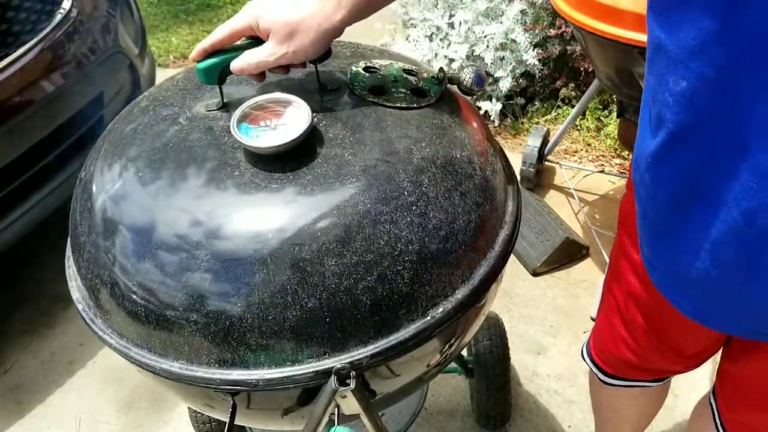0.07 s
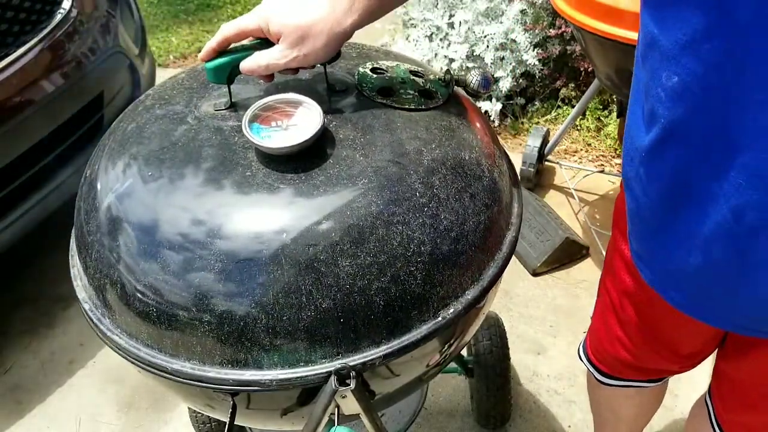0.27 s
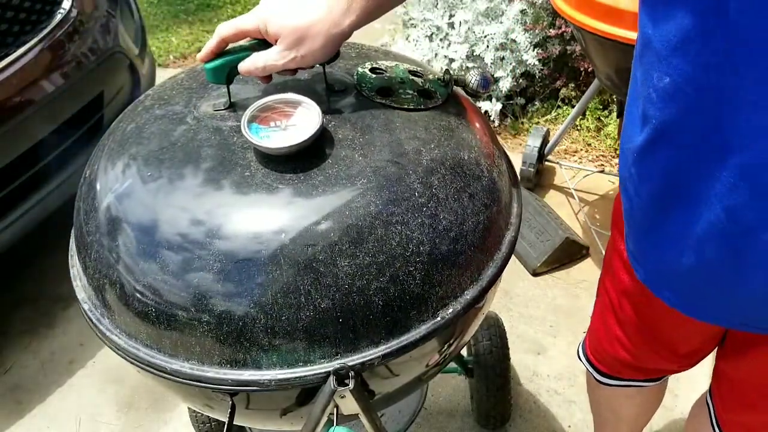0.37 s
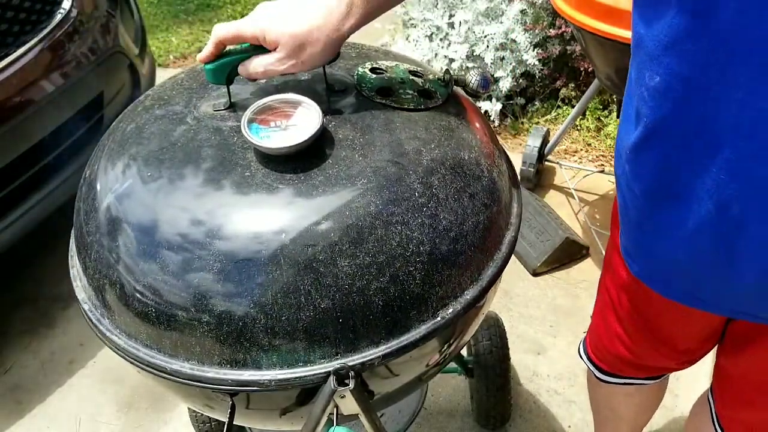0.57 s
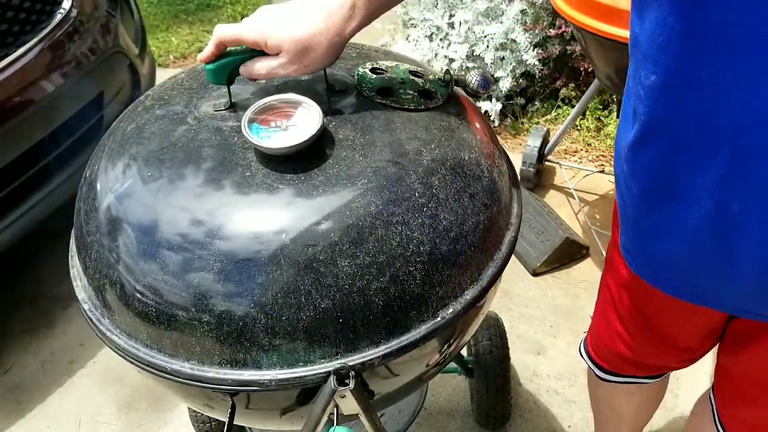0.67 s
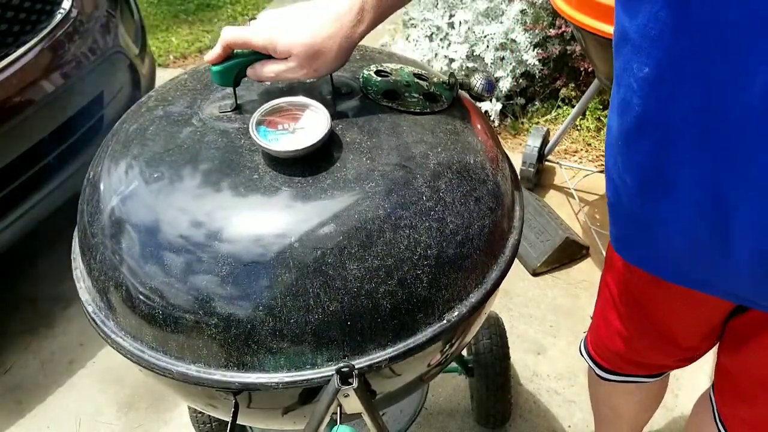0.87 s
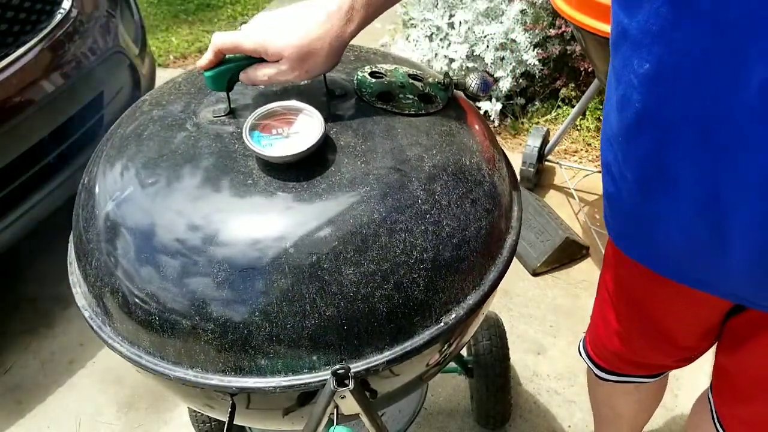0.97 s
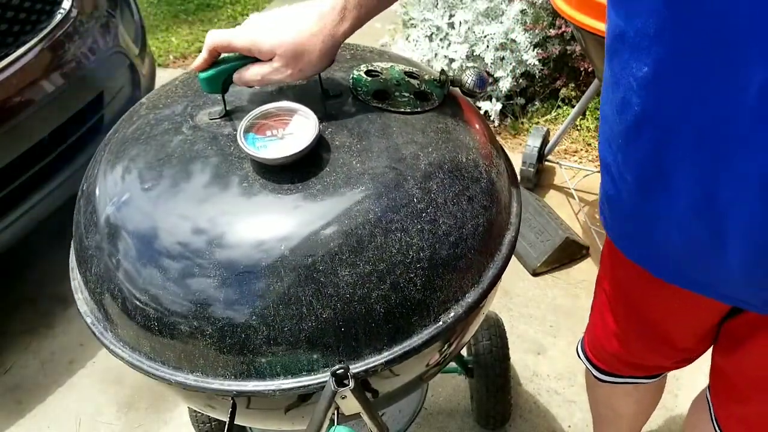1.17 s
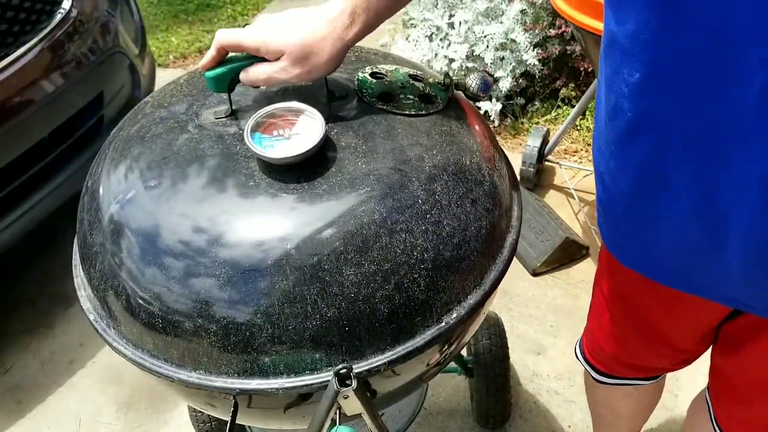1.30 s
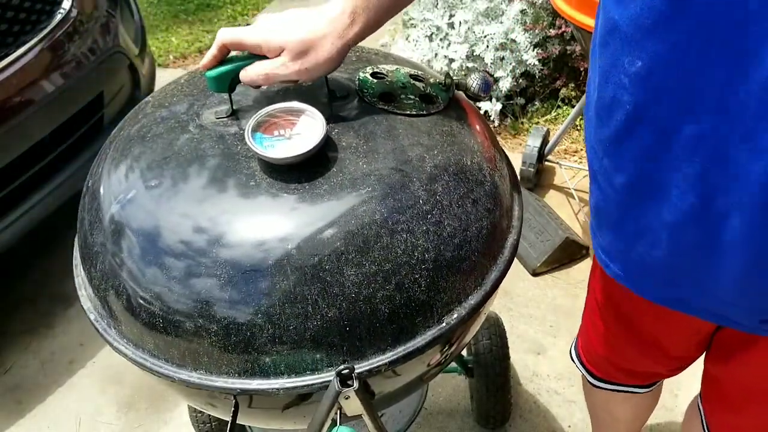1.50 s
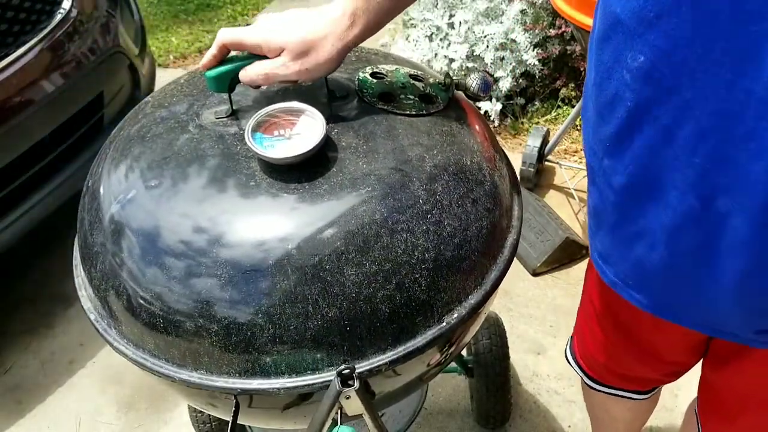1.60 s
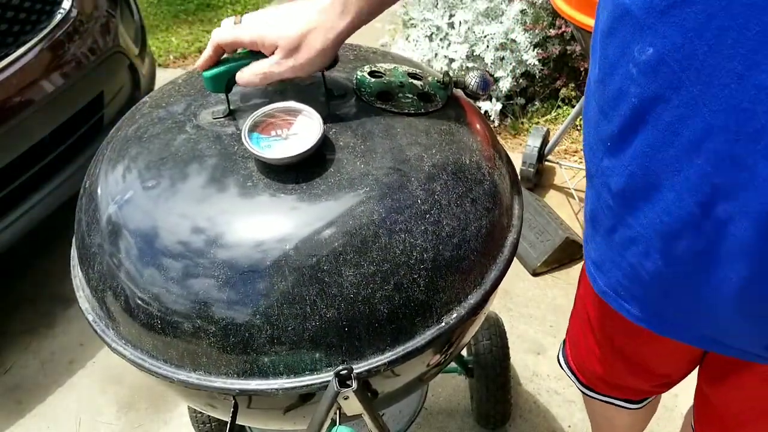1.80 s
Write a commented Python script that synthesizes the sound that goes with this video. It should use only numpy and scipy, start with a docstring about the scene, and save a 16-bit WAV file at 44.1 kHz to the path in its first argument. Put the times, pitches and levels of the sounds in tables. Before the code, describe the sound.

A steel lid is shuffled onto a kettle grill, close by. A soft scrape and bump lead to a hollow clunk with a short ringing clash of rims at about 0.3 seconds. Light ticks follow near 0.6 seconds. The lid rasps and clunks again around 1.1 seconds, then settles with small clicks, scrapes and dull bumps by 1.6 seconds. Faint outdoor air continues underneath.

```python
"""A soft scrape and a dull bump, close by: a domed steel lid is shuffled onto a kettle grill.
Twice it drops home with a clunk, as the dome flexes and the kettle rings, and a short clash of the rims.
Between the blows the enamel rasps rim on rim, loose fittings tick and the lid rumbles in the hand,
all over the faint outdoor air of a quiet patio."""
import sys
import numpy as np
from scipy import signal
from scipy.fft import rfft, irfft
from scipy.io import wavfile

SR = 44100
rng = np.random.default_rng(int(sys.argv[2]) if len(sys.argv) > 2 else 0)


def dump_mix(stems):
    """Bounce the given channels to the path in sys.argv[1] as a 16-bit WAV at rate SR."""
    frames = np.atleast_2d(stems).T  # one column per channel
    limited = np.clip(frames, -1, 1)  # hard clip at full scale
    pcm = np.round(limited * 32767).astype(np.int16)
    wavfile.write(sys.argv[1], SR, pcm)


N = 81585

# how alike the grill sounds left and right: freq_hz, correlation
GRILL_LIKENESS = [(190, 1), (300, 0.82), (1400, 0.35), (6500, -0.25), (14000, 0)]


def amp(db):
    """Decibels to gain."""
    return 10 ** (np.asarray(db) / 20)


def decay(t, level_db, t60_s):
    """An envelope that starts at level_db and falls 60 dB in t60_s."""
    return amp(level_db - 60 * t / t60_s)


def unit(x):
    """Scales to rms 1."""
    return x / np.sqrt(np.mean(x ** 2) + 1e-20)


def curve_at(points, hz):
    """Reads a curve on a log-frequency axis."""
    freq_hz, value = np.transpose(points)
    return np.interp(np.log(hz + 1), np.log(freq_hz + 1), value)


def add(mix, start_s, sound):
    """Mixes a sound in at start_s."""
    part = mix[:, max(round(start_s * SR), 0):][:, :sound.shape[-1]]
    part += sound[..., :part.shape[1]]


def filtered(x, hz, kind, order):
    """A low-pass or high-pass."""
    return signal.sosfilt(signal.butter(order, min(hz, SR / 3), kind, fs=SR, output="sos"), x)


def colour(pair, spectrum, likeness):
    """Gives two unrelated signals a tone and a stereo width, at rms 1."""
    hz = np.fft.rfftfreq(pair.shape[1], 1 / SR)
    left, other = rfft(pair)
    same = np.clip(curve_at(likeness, hz), -1, 1)
    right = same * left + np.sqrt(1 - same ** 2) * other
    return unit(irfft(np.array([left, right]) * amp(curve_at(spectrum, hz)), pair.shape[1]))


def wash(spectrum, size):
    """Shaped noise that stands for the steel's countless overlapping modes."""
    return colour(rng.standard_normal((2, size)), spectrum, GRILL_LIKENESS)


def patio_air():
    """A steady bed of low rumble and distant outdoor hiss."""
    # tone of the air: freq_hz, relative_db
    spectrum = [(22, -12), (45, -7.5), (105, 1.5), (160, -19), (550, -30), (950, -19.5), (1650, -21.5),
                (2600, -43), (6000, -41), (9300, -55.5), (12500, -39.5)]
    # centred lows, wide highs: freq_hz, correlation
    likeness = [(130, 0.91), (700, 0.12), (2000, 0.029)]
    return amp(-53) * colour(rng.standard_normal((2, N)), spectrum, likeness)


def handling(seated_s=1.59, fade_s=0.036):
    """The lid rumbles faintly in the hand until it is seated."""
    # dull body of the moving lid: freq_hz, relative_db
    spectrum = [(60, -2), (110, 0.5), (215, 6), (330, -20), (2000, -94)]
    moving = np.clip((seated_s - np.arange(N) / SR) / fade_s, 0, 1)
    return amp(-57) * wash(spectrum, N) * moving


def scrape(grains_per_s=5000, grain_spread_db=2.8, rasps_per_s=130, rasp_db=2.2):
    """Tiny catches of the enamel bunch into rasps as the lid slides, and set the rim singing."""
    # swells of rim sliding on rim: time_s, level_db
    slide = [(0, -55.5), (.04, -50.5), (.105, -52.5), (0.143, -64), (0.21, -39), (.23, -48), (.255, -36),
             (.45, -77), (.83, -76), (0.877, -57.5), (.94, -66.5), (.985, -57.5), (1.074, -61),
             (1.087, -43), (1.149, -34.5), (1.23, -62.5), (1.28, -48.5), (1.32, -52.5), (1.386, -46),
             (1.408, -37.5), (1.453, -54), (1.51, -66), (1.645, -61), (1.69, -75)]
    # tone of the grit: freq_hz, relative_db
    spectrum = [(250, 16), (600, 1), (2200, -0.5), (2950, -3.5), (5600, -2), (7500, -6.5), (9300, -28),
                (12500, -6), (15000, -21)]
    # rim resonances under the slide: pitch_hz, width_hz, relative_db
    resonances = [(2834, 140, -12), (2980, 80, -14.5), (5540, 820, -22)]
    t = np.arange(N) / SR
    strength = amp(grain_spread_db * np.minimum(rng.exponential(1, N), 4))
    catches = rng.random(N) < grains_per_s / SR
    knots_s = np.arange(0, N / SR, 1 / rasps_per_s)
    rasp = amp(rasp_db * np.interp(t, knots_s, rng.standard_normal(len(knots_s))))
    grit = colour(strength * catches * rasp * rng.standard_normal((2, N)), spectrum, GRILL_LIKENESS)
    singing = sum(amp(db) * unit(signal.lfilter(*signal.iirpeak(hz, hz / width_hz, SR), grit))
                  for hz, width_hz, db in resonances)
    return unit(grit + singing) * amp(np.interp(t, *np.transpose(slide)))


def kettle_ring(t):
    """Lid and bowl ring together, hollow, under a short wash from the dome."""
    # modes of the closed kettle: pitch_hz, relative_db, t60_s
    modes = [(111, -5, .16), (196, -6, .16), (246, -6, .14), (274, -8, .15), (304, -11, .18),
             (356, -5, .16), (441, -16, .44), (490, -14, .28), (504, -3, .21), (556, -3, .17),
             (660, -11, .14), (757, -13, .16), (820, -13, .14), (983, -3, .14)]
    # dense ring of the dome: freq_hz, relative_db
    dome = [(50, -20), (150, 10), (350, 2.5), (950, -1.5), (1300, -13), (2500, -6.5), (6000, -58)]
    hollow = sum(decay(t, db, t60_s) * np.sin(2 * np.pi * hz * t) for hz, db, t60_s in modes)
    return hollow + wash(dome, len(t)) * decay(t, level_db=1, t60_s=0.19)


def knocks(rise_s=0.0012):
    """Each blow flexes the dome in a thud and rings the kettle; a soft contact dulls the upper modes."""
    # lid bumps on bowl: start_s, thud_hz, thud_db, thud_t60_s, ring_db, cutoff_hz
    bumps = [(0.0729, 269.6, -34.5, 0.19, -45, 930), (0.233, 218, -20, 0.27, -32, 350),
             (0.262, 192, 2.5, 0.014, -28, 540), (0.275, 142, -17, 0.048, -25.5, 386),
             (0.2938, 111.7, -20, 0.25, -45, 380), (.341, 175, -29, 0.064, -33.5, 266),
             (0.618, 136, -33.5, 0.05, -59, 255), (0.88, 123, -36, 0.32, -41.5, 153),
             (.976, 124, -24.5, 0.024, -45, 334), (1.0211, 127.6, -28, 0.093, -40, 314),
             (1.0814, 168, -29, 0.31, -33.5, 413), (1.1228, 205, -14, 0.1, -25, 800),
             (1.13105, 115, -16.5, .06, -28.5, 1250), (1.1525, 104, -16, 0.12, -33, 900),
             (1.336, 197, -35, 0.18, -76, 390), (1.358, 109, -27, 0.054, -49, 610),
             (1.3986, 129, -24.5, 0.077, -43, 646), (1.421, 79.5, -25, 0.11, -43.5, 468),
             (1.486, 137.5, -40, 0.11, -49.5, 450)]
    out, t = np.zeros((2, N)), np.arange(SR // 2) / SR
    attack = 1 - np.exp(-t / rise_s)
    for start_s, thud_hz, thud_db, thud_t60_s, ring_db, cutoff_hz in bumps:
        thud = attack * decay(t, thud_db, thud_t60_s) * np.cos(2 * np.pi * thud_hz * t)
        clunk = thud + amp(ring_db) * kettle_ring(t)
        add(out, start_s, filtered(clunk, cutoff_hz, "low", order=3))
    return out


def rim_jangle(t):
    """Steel on steel: a crack and a dense, quickly damped jangle."""
    # dense ring of the rim: freq_hz, relative_db
    spectrum = [(400, 3), (900, -5.5), (1500, 1), (3000, -6.5), (4000, -9), (5600, -5.5), (7500, -19),
                (9300, -36), (12500, -43), (15000, -50)]
    # its tail, band by band: freq_hz, t60_s
    tails = [(1000, 0.3), (3000, 0.27), (6000, 0.11), (14000, 0.22)]
    hz, frame_s, bands = signal.stft(wash(spectrum, len(t)), SR, nperseg=256)
    bands *= decay(frame_s, level_db=1.5, t60_s=curve_at(tails, hz)[:, None])
    jangle = signal.istft(bands, SR, nperseg=256)[1][:, :len(t)]
    crack = decay(t, level_db=-4, t60_s=0.025)
    return jangle * (1 + crack)


def rim_ring(t, angle_deg, stereo_spread_rad=0.94):
    """The rim's clear tones: where the blow lands around it sets their balance."""
    # modes of the steel rim: pitch_hz, relative_db, t60_s
    modes = [(1206, -9, .28), (1376, -4, .24), (1502, -7, .25), (1577, -6, .19), (1680, -11, .27),
             (1732, 0, .23), (2094, -13, .16), (2347, -16, .22), (2770, -6, .18), (2982, -7, .19),
             (3305, -12, .18), (3430, -5, .14)]
    phases = 2 * np.pi * rng.random((len(modes), 1, 1))
    phases = phases + stereo_spread_rad * rng.standard_normal((len(modes), 2, 1))
    shares = np.cos(np.radians(angle_deg) * np.arange(1, len(modes) + 1))
    return sum(share * decay(t, db, t60_s) * np.sin(2 * np.pi * hz * t + phase)
               for (hz, db, t60_s), phase, share in zip(modes, phases, shares))


def clashes():
    """Where the bare rims meet, they jangle and ring on."""
    # rim hits on rim: start_s, jangle_db, ring_db, angle_deg
    hits = [(.074, -55, -54, 20), (.617, -57, -58, 8), (.2619, -32, -38, 0), (.275, -36.5, -33, 0),
            (.2937, -39.5, -50, 5), (1.122, -38.5, -50, 15), (1.1325, -42, -40, 15), (1.1555, -39, -42, 15)]
    out, t = np.zeros((2, N)), np.arange(SR // 2) / SR
    for start_s, jangle_db, ring_db, angle_deg in hits:
        add(out, start_s, amp(jangle_db) * rim_jangle(t) + amp(ring_db) * rim_ring(t, angle_deg))
    return out


def ticks():
    """The loose handle and fittings click brightly: a snap and a short ring."""
    # light metal clicks: start_s, ring_db, t60_s, tilt_db_per_octave
    clicks = [(.2765, -36, 0.06, -3.5), (1.119, -42, 0.06, -3.5), (1.2485, -43, 0.15, -3),
              (1.252, -40.5, .07, -1), (0.574, -52.5, 0.17, -3.5), (0.6145, -49, 0.034, -2.5),
              (1.5235, -47.5, 0.07, -2.5)]
    # tone of the fittings before each click's tilt: freq_hz, relative_db
    spectrum = [(300, 10), (1000, 2), (3100, 11.5), (4000, 7.5), (5500, 15.5), (8000, 5), (9400, 3),
                (12500, 14), (15000, 5)]
    out, t = np.zeros((2, N)), np.arange(SR // 4) / SR
    snap = decay(t, level_db=4, t60_s=0.008)
    for start_s, ring_db, t60_s, tilt in clicks:
        metal = wash([(hz, db + tilt * np.log2(hz)) for hz, db in spectrum], len(t))
        add(out, start_s, metal * amp(ring_db) * (decay(t, 0, t60_s) + snap))
    return out


def scene():
    """The lid's hits over its scrape, its rumble and the open air."""
    return knocks() + clashes() + ticks() + scrape() + handling() + patio_air()


def record(dry, low_cut_hz=36.6, high_cut_hz=14900):
    """Leans the treble to the left, then trims the sub-bass and the very top."""
    # stereo lean: freq_hz, left_minus_right_db
    balance = [(2300, 0.81), (4500, 0.26), (8000, 6.5), (13000, 4.2)]
    lean_db = curve_at(balance, np.fft.rfftfreq(N, 1 / SR))
    panned = irfft(rfft(dry) * amp(np.array([lean_db, -lean_db]) / 2), N)
    trimmed = filtered(panned, low_cut_hz, "high", order=4)
    high_cut = signal.firwin(401, high_cut_hz, window=("kaiser", 9), fs=SR)
    return signal.oaconvolve(trimmed, high_cut[None], "same")


dry = scene()
out = record(dry)
dump_mix(out)
```